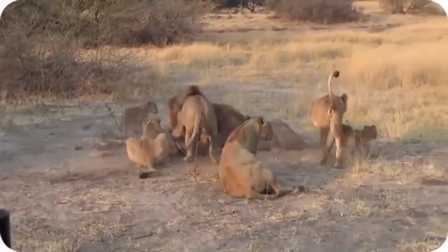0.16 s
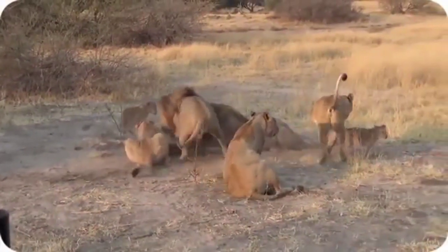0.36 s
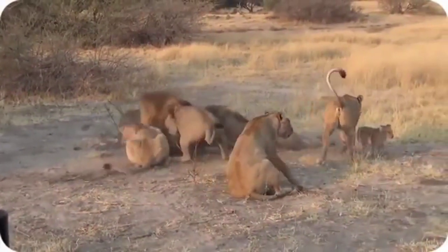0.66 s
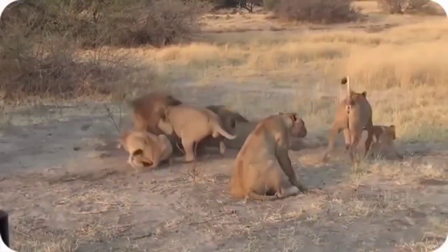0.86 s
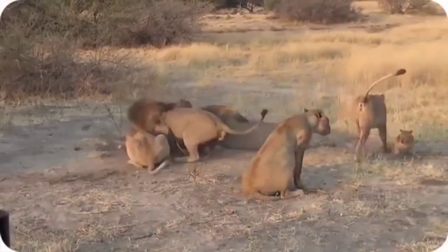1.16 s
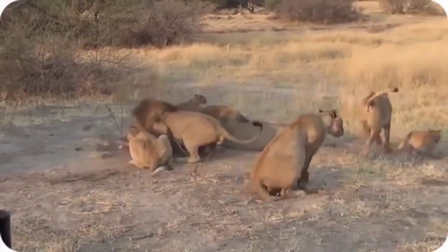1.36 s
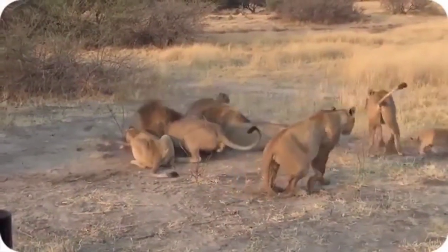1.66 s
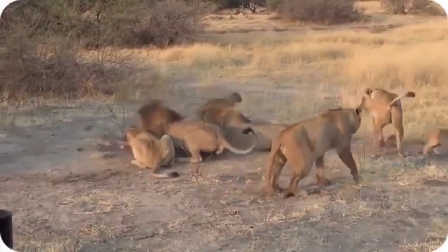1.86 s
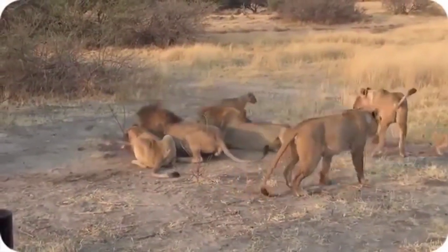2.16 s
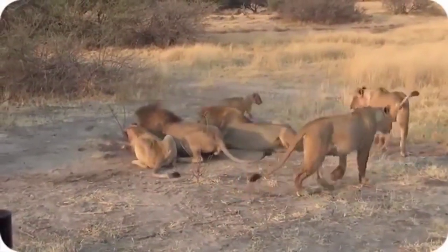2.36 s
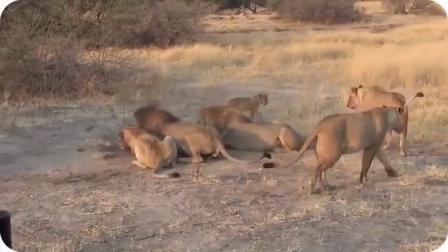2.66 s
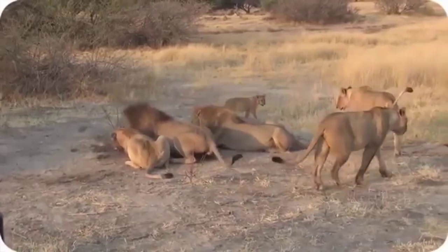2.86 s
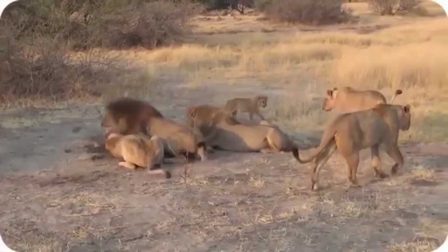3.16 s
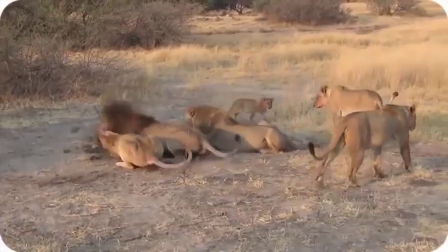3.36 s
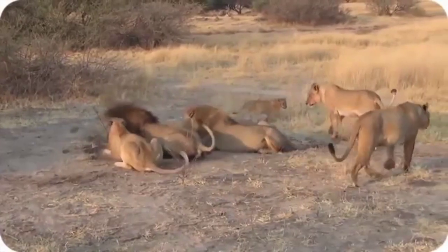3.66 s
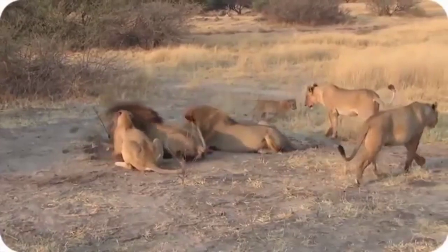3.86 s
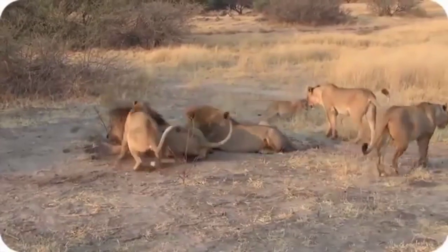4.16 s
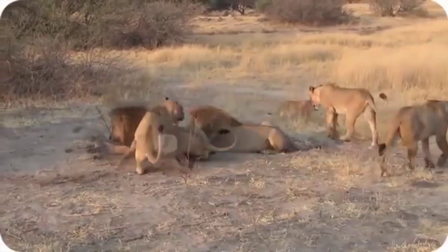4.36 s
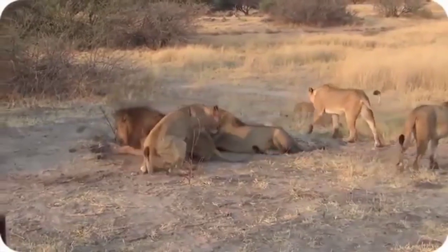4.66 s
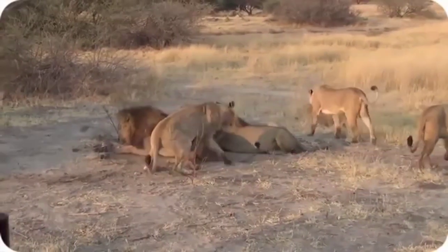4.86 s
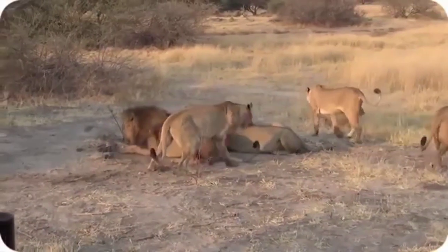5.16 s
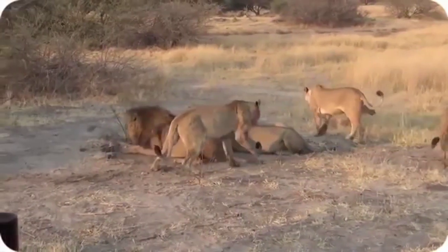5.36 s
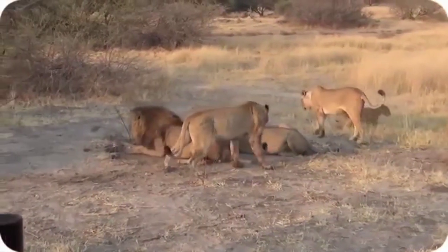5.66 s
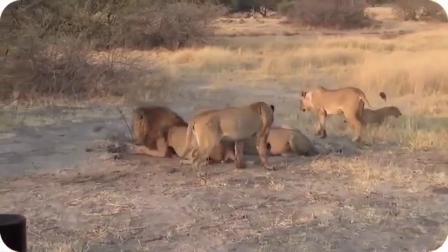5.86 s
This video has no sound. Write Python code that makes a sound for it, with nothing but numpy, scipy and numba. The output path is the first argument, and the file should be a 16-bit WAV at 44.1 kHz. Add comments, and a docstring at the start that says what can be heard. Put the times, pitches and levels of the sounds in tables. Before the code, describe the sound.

Deep throaty lion growls and torn, raspy snarls over dry open ground, fading to a soft whining moan, with a nearby camera click at each end.

```python
"""Dry open plain, lions a little left of centre squabbling over food, a camera close to the microphone.
A deep rattling growl, made of uneven vocal fold pulses and single slaps, runs under two loud snarling bouts
of tones and torn air; then one animal whines and moans in nearly pure tones. Filtered noise makes the hisses,
a bright rustle of grass and breath, snapping twigs and faint air; noise bursts make the camera shutter, which
fires twice. The loudest snarls overload the recorder."""
import sys
import numpy as np
from scipy import signal
from scipy.fft import rfft, irfft
from scipy.io import wavfile
from scipy.ndimage import uniform_filter1d, map_coordinates
from numba import njit

SR = 44100
rng = np.random.default_rng(int(sys.argv[2]) if len(sys.argv) > 2 else 0)


def pcm_store(signal):
    """Save signal as 16-bit PCM."""
    levels = np.round(np.clip(np.atleast_2d(signal), -1, 1) * 32767)
    wavfile.write(sys.argv[1], SR, levels.astype(np.int16).T)


N = 265041
TIME = np.arange(N) / SR


def undb(db):
    """Decibels to gain."""
    return 10 ** (np.asarray(db) / 20)


def unit(x):
    """Scale to rms 1."""
    return x / np.sqrt(np.mean(x ** 2))


def even(x, span_s):
    """Hold the slow level near rms 1 and keep the fast texture."""
    size = max(int(span_s * SR), 8)
    power = uniform_filter1d(uniform_filter1d(x ** 2, size), size)
    floor = 1e-6 * np.mean(x ** 2)
    return x / np.sqrt(np.abs(power) + floor)


def curves(rows):
    """Columns of a table joined by straight lines."""
    s, *columns = np.transpose(rows)
    return [np.interp(TIME, s, c) for c in columns]


def phrases(tables, fade_s=0.0027):
    """Columns of several tables, led by a gate that is open during each."""
    gate = 0
    for table in tables:
        start, end = table[0][0], table[-1][0]
        inside_s = np.minimum(TIME - start, end - TIME)
        gate = gate + np.clip(inside_s / fade_s + 1, 0, 1)
    return [np.minimum(gate, 1)] + curves(np.vstack(tables))


def swells(rows, attack_s, release_s, sag_db_per_s=0):
    """Gain of (start, length, dB) events: each rises, holds with a steady sag, then dies away."""
    gain = np.zeros(N)
    for start, length, db in rows:
        age = np.maximum(TIME - start, 0)
        rise = np.minimum(age / attack_s, 1)
        release = np.exp(-np.maximum(age - length, 0) / release_s)
        level = undb(db - sag_db_per_s * np.minimum(age, length))
        gain = np.maximum(gain, rise * release * level)
    return gain


def noise():
    """White noise."""
    return rng.standard_normal(N)


def walk(rate):
    """Random drift of spread near 1: straight lines between `rate` random points per second."""
    return np.interp(TIME * rate, np.arange(4096), rng.standard_normal(4096))


@njit
def svf(x, hz, width):
    """Moving band-pass, gain 1 at the centre."""
    y, b, l = np.empty(len(x)), 0., 0.
    for i in range(len(x)):
        g, k = np.tan(np.pi * hz[i] / SR), width[i] / hz[i]
        v = (b + g * (x[i] + 1e-18 - l)) / (1 + g * (g + k))
        b, l, y[i] = 2 * v - b, l + 2 * g * v, k * v
    return y


def band(x, hz, width):
    """One resonance, fixed or moving."""
    return svf(x, hz * np.ones(N), width * np.ones(N))


def ring(x, modes):
    """A set of fixed resonances."""
    return sum(undb(db) * band(x, hz, width) for hz, width, db in modes)


def colour(x, points):
    """Causal (minimum-phase) filter through (Hz, dB) points."""
    hz, db = np.transpose(points)
    size = 4096
    bin_hz = np.arange(size // 2 + 1) * SR / size
    log_gain = np.log(undb(np.interp(np.log(bin_hz + 1), np.log(hz), db)))
    cepstrum = irfft(log_gain)[:size // 2]
    cepstrum[0] /= 2
    response = irfft(np.exp(rfft(2 * cepstrum, size)))
    return signal.fftconvolve(x, response)[:N]


def passband(x, low_hz, high_hz, order=2):
    """Steep band limits."""
    sos = signal.butter(order, [low_hz, high_hz], "band", fs=SR, output="sos")
    return signal.sosfilt(sos, x + 1e-18)


def strikes(times, sizes):
    """Impulses at given times."""
    samples = np.clip(np.asarray(times) * SR, 0, N).astype(int)
    return np.bincount(samples, sizes, N + 1)[:N]


def fade(x, decay_s):
    """Each impulse dies away exponentially."""
    return signal.lfilter([1], [1, -np.exp(-1 / (decay_s * SR))], x + 1e-18)


def damped(times, sizes, hz, decay_s, rise_s):
    """One damped resonance per event, each with its own pitch."""
    t = TIME[:SR // 12]
    envelope = np.exp(-t / decay_s) * (1 - np.exp(-t / rise_s))
    out = np.zeros(N + len(t))
    for at, size, f in zip((times * SR).astype(int), sizes, hz):
        out[at:at + len(t)] += size * np.sin(2 * np.pi * f * t) * envelope
    return out[:N]


def tone(hz, wobble, overtones=()):
    """A tone whose pitch trembles quickly; overtones are (multiple, dB)."""
    phase = 2 * np.pi * np.cumsum(hz * (1 + wobble * walk(150))) / SR
    partials = sum(undb(db) * np.sin(k * phase) for k, db in overtones)
    return np.sqrt(2) * (np.sin(phase) + partials)


def folds(hz, rough, jitter, scatter_db):
    """Vocal fold pulses of uneven spacing and strength."""
    phase = np.cumsum(hz * np.exp(jitter * rough * walk(np.mean(hz)))) / SR
    pulses = np.diff(np.floor(phase), prepend=0)
    return pulses * undb(scatter_db * rough * noise())


def mouth(x, modes, drift):
    """Resonances that wander in pitch and level as tongue and lips move."""
    drift = np.clip(drift, 0, .2)
    out = 0
    for hz, width, db in modes:
        level = undb(db + 8.3 * walk(21.41))
        out = out + level * band(x, hz * np.exp(drift * walk(14)), width)
    return out


def waver(x, drift, rate):
    """Slide all resonances of a sound up and down together by a wandering delay."""
    lag = uniform_filter1d(walk(rate), SR // 40) * drift * SR / rate / np.sqrt(2)
    return map_coordinates(x, [np.arange(N) + lag], order=3, mode="mirror")


def place(x, pan_db, spread_db):
    """Level difference between the channels (positive is left), plus scatter from ground and bushes."""
    t = TIME[:SR // 4]
    tail = rng.standard_normal((2, len(t))) * np.exp(-t / 0.0068) * (t > .004)
    tail /= np.sqrt(np.sum(tail ** 2, axis=1, keepdims=True))
    scatter = signal.fftconvolve(x[None], tail, axes=1)[:, :N]
    direct = x * undb(np.array([[pan_db], [-pan_db]]) / 2)
    return direct + undb(spread_db) * scatter


# spectrum of the air over the plain: (frequency [Hz], level [dB])
PLAIN_COLOUR = [(180, -19.5), (300, -2), (439, -1), (509, -27), (663, -2.5), (1020, -15), (1140, -3.5),
                (1490, -13.5), (2930, -19), (3230, -20.5), (4420, -29), (5660, -17.5), (9760, -22),
                (14500, -24), (15500, -66)]


def plain():
    """Faint, nearly steady hiss of the open plain, with a little low rumble: two filtered noises."""
    air = unit(colour(noise(), PLAIN_COLOUR)) * undb(-45.5 + walk(7.1))
    rumble = undb(-49) * unit(passband(noise(), 35, 300))
    return air + rumble


# the two shutter cycles beside the microphone: (time [s])
SHUTTER_TIMES = [.2212, 5.7660]
# blows of mirror and curtains within one cycle: (delay [s], level [dB], decay [s])
SHUTTER_BLOWS = [(0, 0, .0035), (.02, -2.5, 0.0034), (.046, -15.5, .006), (.0495, -5, .004),
                 (.0545, -4.5, .005), (.066, -9, 0.0091), (.072, -15, .008), (.082, -6, .006),
                 (.0875, -2.5, .004), (.095, -9.5, 0.0057)]
# spectrum of the camera body: (frequency [Hz], level [dB])
SHUTTER_COLOUR = [(530, -29), (900, -11.5), (1260, -15), (1370, -5), (1590, -25), (1670, -5), (1750, 1),
                  (3380, -18.5), (3710, -12.5), (5060, -19.5), (6580, -7), (8440, -16), (10100, -7.5),
                  (14400, -19), (15500, -19)]


def shutter():
    """Mirror and curtains strike the camera body, whose spring rings briefly."""
    blows = 0
    for delay, db, decay in SHUTTER_BLOWS:
        sizes = undb(db) * np.ones(len(SHUTTER_TIMES))
        blows = blows + fade(strikes(np.add(SHUTTER_TIMES, delay), sizes), decay)
    rattle = blows * noise()
    spring = ring(rattle, [(1790, 120, -1.5), (1870, 92, -7), (6100, 900, -8), (11400, 1100, -19)])
    return undb(-1) * colour(rattle, SHUTTER_COLOUR) + undb(-8) * spring


# bright rustle and breath: scuffed grass, the hiss of the snarls, a faint rise of air:
# (start [s], length [s], level [dB])
RUSTLES = [(.325, 0.31, -38.5), (.49, 0.19, -35.5), (.62, .03, -34.5), (.695, 0.043, -32.5),
           (1.0, 0.239, -49), (1.3, .17, -49), (3.003, .02, -40), (3.04, .2, -47.5), (3.41, 0.062, -34.5),
           (3.61, 0.095, -45), (3.76, 0.23, -48.5), (4.15, 0.035, -48), (4.317, 0.044, -39),
           (4.385, 0.048, -42), (4.6, 0.46, -53), (5.05, 0.52, -52.5)]
# spectrum of the rustle: (frequency [Hz], level [dB])
RUSTLE_COLOUR = [(880, -1.5), (1500, -22), (2310, -8), (3430, -5.5), (4410, -12), (6740, 1.5), (7720, -6),
                 (9630, -3.5), (10800, -9), (14400, -16.5), (15000, -23)]
# dry twigs snapping: (time [s], level [dB])
TWIGS = [(.0765, -29), (.1988, -24.5), (0.473, -23), (.5147, -27), (.6135, -28), (0.6295, -18), (.668, -32),
         (1.5369, -32), (1.563, -33), (1.662, -29.5), (2.7108, -31.5), (2.9247, -31), (3.0123, -21.5),
         (4.3488, -24), (4.602, -26.5), (5.3978, -30)]


def rustle():
    """Scuffed grass, the hiss of the snarls and a faint rise of air, all crackling noise; twigs snap."""
    level = swells(RUSTLES, attack_s=0.0075, release_s=.015, sag_db_per_s=10)
    crackle = noise() * undb(5.3 * walk(500))
    s, db = np.transpose(TWIGS)
    snaps = fade(strikes(s, undb(db)), 0.0022) * noise()
    return level * unit(colour(crackle, RUSTLE_COLOUR)) + undb(-0.5) * passband(snaps, 4900, 11600)


# whine sliding into a moan: (time [s], pitch [Hz], fundamental level [dB], second partial level [dB])
WHINE = [(4.9, 140, -26, -27.5), (4.985, 184, -6, -30.5), (5.05, 206.8, -10.5, -19.5),
         (5.09, 217.3, -28, -19.5), (5.164, 229, -42, -16), (5.4, 209.8, -33, -20.5),
         (5.46, 207, -17.5, -23), (5.518, 197, -12, -24), (5.56, 211.2, -28.5, -42),
         (5.7, 217.5, -29.5, -46), (5.826, 210.3, -19, -23), (5.904, 196.7, -11.5, -30.5),
         (6.01, 225, -34, -48)]
# a second tone, lower than the whine's second partial: (time [s], pitch [Hz], level [dB])
UNDERTONE = [(5.1, 342, -27), (5.17, 341.5, -21.5), (5.232, 308, -22), (5.316, 366.5, -16),
             (5.4, 329.5, -9), (5.47, 380, -33)]
# a creak an octave below the moan: (start [s], length [s], level [dB])
CREAK = [(5.78, 0.203, -22.5)]


def whine():
    """A nearly pure voice rises, splits into two tones, turns hoarse and settles to a creaky closed-mouth moan."""
    gate, hz, first_db, second_db = phrases([WHINE])
    phase = 2 * np.pi * np.cumsum(hz * (1 + 0.019 * walk(70))) / SR
    upper = np.sin(2 * phase) + undb(-27.0) * np.sin(3 * phase)
    voice = gate * (undb(first_db + 3.5) * np.sin(phase) + undb(second_db + 3.5) * upper)
    creak = swells(CREAK, attack_s=0.069, release_s=.03) * np.sqrt(2) * np.sin(phase / 2)

    gate, under_hz, under_db = phrases([UNDERTONE])
    under = np.pi * np.cumsum(under_hz * (1 + 0.013 * walk(70))) / SR
    split = np.sin(2 * under) + undb(-35) * np.sin(4 * under)
    split += undb(-17.0) * np.sin(under)  # every other cycle is weaker
    split += undb(-30.0) * np.sin(2 * (under + phase))  # the two tones modulate each other

    # hoarse noise climbs to its peak at 5.35 s, then clears faster [dB per s]
    late = TIME - 5.35
    hoarse_db = -16.5 + np.minimum(70 * late, -177 * late)
    hoarse = unit(band(band(noise(), 473, 76), 443, 110)) * undb(hoarse_db)
    return voice + creak + gate * undb(under_db) * split + hoarse


# open-mouthed hisses: (start [s], length [s], level [dB], setting of the teeth's part against it [dB])
HISSES = [(.315, 0.042, -27.5, -18), (.38, 0.27, -37, -5), (0.694, 0.04, -30, -13),
          (0.956, 0.198, -34.5, 4.5), (2.814, 0.054, -41.5, -20), (2.987, 0.047, -34, -1),
          (3.4, .09, -35.5, -1), (4.159, .05, -39, 0), (4.317, 0.013, -32.5, 2), (4.38, 0.051, -46, -7),
          (4.486, 0.012, -37, -5), (5.586, 0.018, -39.5, -25)]
# wandering resonances of the open mouth, also in the snarls: (frequency [Hz], width [Hz], level [dB])
MOUTH = [(878, 110, 13.5), (970, 36, -1), (1314, 100, 5)]
# hissing resonances between the teeth, also in the snarls: (frequency [Hz], width [Hz], level [dB])
TEETH = [(1390, 130, -3), (1800, 200, 0), (2130, 250, -2), (3050, 350, -11), (3800, 400, -19),
         (6000, 1800, -25)]


def hiss():
    """A lion hisses with its jaws open, noise through mouth resonances; bared teeth make it brighter."""
    start, length, db, teeth_db = np.transpose(HISSES)
    air = noise() * undb(5.7 * walk(200))
    jaws = even(passband(mouth(air, MOUTH, drift=0.16), 540, 3000), 0.041)
    teeth = even(passband(mouth(air, TEETH, drift=0.072), 1160, 5600), 0.033)
    jaws_gain, teeth_gain = (swells(zip(start, length, level_db), attack_s=0.014, release_s=.014)
                             for level_db in (db, db + teeth_db - 6))
    return jaws * jaws_gain + teeth * teeth_gain


# short rising yowls within the growl: (start [s], length [s], from [Hz], to [Hz], level [dB])
YOWLS = [(1.89, .06, 580, 900, -35), (1.975, .075, 620, 930, -36), (2.49, .04, 560, 780, -37),
         (2.57, .045, 460, 780, -32)]


def yowls():
    """Thin, rough tones that slide upwards."""
    out = np.zeros(N)
    for start, length, from_hz, to_hz, db in YOWLS:
        part = np.clip((TIME - start) / length, 0, 1)
        arch = np.sqrt(np.abs(np.sin(np.pi * part)))
        out += undb(db) * arch * tone(from_hz + (to_hz - from_hz) * part, wobble=0.0195)
    return out


# deep growls, one per push of air: (start [s], length [s], chest level [dB], throat level [dB])
GROWLS = [(-.03, .14, -14.5, -16), (0.146, 0.13, -13, -14.5), (0.318, 0.14, -15, -14.5),
          (0.48, 0.15, -16, -18.5), (0.686, 0.055, -7.5, -11.5), (.81, 0.28, -20.5, -8.5),
          (1.159, 0.14, -17, -14), (1.31, .16, -12, -13), (1.459, .13, -12, -15),
          (1.634, 0.13, -15.5, -16.5), (1.815, 0.25, -15.5, -10.5), (2.086, 0.072, -21.5, -26),
          (2.258, 0.062, -15.5, -16), (2.402, .1, -14.5, -14), (2.487, .18, -17.5, -13),
          (2.683, 0.13, -21.5, -28.5), (2.815, 0.065, -16.5, -22), (2.962, 0.082, -10.5, -5.5),
          (3.051, 0.096, -21.5, -13), (3.217, 0.087, -13.5, -6), (3.389, 0.17, -9.5, -6),
          (3.611, 0.098, -12.5, -11), (3.799, 0.082, -15, -9), (3.899, 0.23, -20, -15),
          (4.18, 0.042, -12, -19), (4.277, .23, -12.5, -15), (4.516, 0.14, -20, -34.5),
          (4.709, 0.036, -28.5, -50), (4.83, 0.13, -15, -26), (4.919, .13, -13, -16),
          (5.066, 0.17, -27.5, -24.5), (5.494, 0.25, -28.5, -42), (5.744, 0.24, -25.5, -32)]
# chest resonances: (frequency [Hz], width [Hz], level [dB])
CHEST = [(80, 23, -30), (127.4, 41.3, 16), (160, 32, -17)]
# spectrum of the growling throat: (frequency [Hz], level [dB])
GROWL_THROAT = [(100, -28), (170, 5), (205, -6), (243, 7.5), (312, -1.5), (470, 1), (516, -5.5),
                (690, -27.5), (864, -23), (1050, -41), (1170, -23), (1280, -30), (1930, -39.5), (3410, -46),
                (4000, -69), (5200, -82), (8800, -120)]


def growl(slap_s):
    """Slow, uneven pulses boom in the chest and rattle in the throat."""
    start, length, chest_db, throat_db = np.transpose(GROWLS)
    chest_level, throat_level = (
        swells(zip(start, length, db), attack_s=0.016, release_s=0.023, sag_db_per_s=13)
        for db in (chest_db, throat_db))
    pulses = folds(52, rough=1, jitter=.3, scatter_db=4.0)
    air = fade(pulses, 0.012) * noise()
    chest = passband(ring(pulses + 0.042 * air, CHEST), 61.0, 177, order=3)
    throat = waver(colour(pulses + 0.077 * air, GROWL_THROAT), drift=.07, rate=13)
    # while the folds slap singly they flutter less
    midpoints = (slap_s[1:] + slap_s[:-1]) / 2
    gap_s = np.abs(TIME - slap_s[np.searchsorted(midpoints, TIME)])
    held = np.exp(-(gap_s / .022) ** 2)
    chest_gain = (1 - .3 * held) * chest_level
    throat_gain = (1 - .62 * held) * throat_level * undb(-2.0)
    return chest_gain * even(chest, 0.028) + throat_gain * even(throat, 0.025)


# slaps given one by one, loud and soft, some within or ending a rattle:
# (time [s], level [dB], rasp level against it [dB], jaw opening [0-1])
SINGLE_SLAPS = [(.076, -1, -23, 0.65), (.336, -5.5, -25, 0.07), (.42, -7, -27, 1),
                (.499, -1.5, -15.5, 0.73), (.628, -7, -21, .8), (.736, -2.5, -22, 0),
                (.819, -0.5, -29, 0.87), (1.106, 1, -13, 0.1), (1.138, 5, -24, 0.04),
                (1.859, 5.5, -30, .05), (2.007, 1, -40, 0), (2.184, -10.5, -21, 0.97),
                (2.227, -5, -20, 0.83), (2.289, -9, -22, 0.08), (2.364, -14, -18, 0.87),
                (2.451, 3, -28, 0.24), (2.51, -8.5, -31, 0.88), (2.619, -6, -15.5, 0.86),
                (2.713, -15, -17, 1), (3.165, -1, -11.5, 0.93), (3.19, 0, -13.5, 0.78),
                (3.208, -0.5, -17, 0.94), (3.396, 3.5, -18, 0.7), (3.499, -0.5, -24, 0.47),
                (3.52, 1.5, -22, 0.55), (4.494, -7, -14.5, 0.63)]
# rattles, runs of slaps of the slack vocal folds:
# (start [s], length [s], rate [slaps/s], level [dB], rasp level against it [dB], jaw opening [0-1])
RATTLES = [(.002, .055, 48, -6.5, -28.5, .85), (.17, .085, 29, -7.5, -23.5, 0.38),
           (1.553, .285, 29.4, -3.5, -24, 0.21), (1.909, .08, 44.5, 0, -30.5, 0.12),
           (2.032, .105, 33.5, -3, -27, 0.25), (2.381, .06, 37.3, -2, -28.5, .4),
           (2.567, .1, 38, -9.5, -40, 0.45), (2.975, .04, 41.3, -1.5, -23.5, 0.63),
           (3.05, .085, 42, -0.5, -27, 1), (4.083, .135, 32.7, -11.5, -18.5, 0.24),
           (4.298, .145, 36.8, -5, -27.5, 0.61), (4.552, .06, 28, -25, -25, .5),
           (4.826, .21, 27, -19.5, -12.5, 0.2)]


def slap_events():
    """Every slap as (s, dB, rasp dB, jaw opening), in order: those given one by one and the uneven runs."""
    rows = list(SINGLE_SLAPS)
    for start, length, rate, db, rasp_db, jaw in RATTLES:
        chance = rng.standard_normal(size=(16, 3))
        for age, (late, louder, wider) in zip(np.arange(0, length, 1 / rate), chance):
            rows.append((start + age + .0005 * late, db + 1.5 * louder, rasp_db, jaw + 0.094 * wider))
    return np.array(sorted(rows))


# the throat's two ringing resonances:
# (jaws shut [Hz], jaws open [Hz], level shut [dB], level open [dB], rise [s])
SLAP_MODES = [(230, 371, 1.5, -8.5, 0.0036), (442, 490, -14, -0.5, 0.0022)]
# spectrum of the crack of a slap: (frequency [Hz], level [dB])
CRACK = [(60, -33.5), (140, -6), (240, 0), (380, 2.5), (520, -2), (620, -15.5), (720, -20.5), (1200, -30.5),
         (4000, -96)]
# rasp resonances of the mouth: (frequency [Hz], width [Hz], level [dB])
SLAP_RASP = [(860, 110, -1), (1180, 170, -2), (1520, 220, -8), (2050, 300, -11), (2900, 500, -21)]


def slaps(events):
    """The folds slap and rebound: a crack; throat rings (retuned by the jaws), chest thumps, mouth barks."""
    s, db, rasp_db, jaw = events.T
    jaw = np.clip(jaw, 0, 1)
    detune = np.exp(0.053 * rng.standard_normal(len(s)))
    throat = 0
    for shut_hz, open_hz, shut_db, open_db, rise_s in SLAP_MODES:
        sizes = undb(db + shut_db + jaw * (open_db - shut_db))
        hz = detune * (shut_hz + jaw * (open_hz - shut_hz))
        throat = throat + damped(s, sizes, hz, 0.0091, rise_s)
    rebound_s = rng.uniform(0.00398, 0.008, len(s))
    push = strikes(s, undb(db)) + strikes(s + rebound_s, undb(db - 3.5))
    crack = undb(31) * colour(push, CRACK)
    chest = passband(band(strikes(s, undb(db - 12.5)), 141, 46), 44, 350)
    body = undb(-1) * passband(throat, 125, 770) + crack + undb(41.0) * chest

    sharp = strikes(s, undb(db + rasp_db))
    torn_air = 0.1 * fade(sharp, 0.0048) * noise()
    rasp = undb(27.0) * passband(ring(sharp + torn_air, SLAP_RASP), 600, 2900)
    bark = undb(6.5) * damped(s, undb(db + rasp_db), 887 * detune ** 2, 0.0044, rise_s=0.002)
    return body, rasp + bark


# three snarls in two bouts: (time [s], pulse rate [Hz], low tone [Hz], upper tone [Hz],
# low voice level [dB], upper voice level [dB], rasp level [dB])
SNARLS = [
    [(.815, 60.04, 289, 569, -10.5, -12, -31), (.85, 75, 282.3, 543.8, -12.5, -10.5, -30),
     (.93, 105.1, 227.8, 479.5, -8.5, -6.5, -34), (.99, 115, 242.4, 410, -11.5, -8, -27),
     (1.08, 120.2, 230.8, 587.6, -16, -12.5, -31.5), (1.135, 115, 218.6, 553, -20, -13, -25.5),
     (1.19, 122, 257, 605.7, -25, -17, -33), (1.27, 135, 263.9, 570, -28, -28, -40.5)],
    [(1.28, 139.9, 276.1, 581, -28, -20, -46), (1.305, 150.1, 298.7, 615.5, -7, -6, -30),
     (1.34, 148, 288.2, 668, -11, -14.5, -34), (1.41, 132.1, 261.2, 505, -9, -22, -35),
     (1.5, 119.7, 279.3, 438.3, -23, -32, -42)],
    [(3.195, 72, 360, 630, -11, -10.5, -32.5), (3.28, 97.06, 285.7, 500, -9.5, -9.5, -27.5),
     (3.36, 125, 297.5, 435, -14, -14, -32), (3.41, 107.5, 275, 570.7, -14, -15.5, -25.5),
     (3.52, 117.9, 247.4, 585, -15, -13.5, -29.5), (3.61, 142.3, 297.4, 489.7, -16.5, -12.5, -44),
     (3.67, 152.9, 307, 484.3, -19.5, -9.5, -35.5), (3.75, 152.3, 303.2, 560.1, -13.5, -21.5, -41),
     (3.84, 114.8, 281, 557, -8, -12, -31.5), (3.91, 93.1, 315.5, 462.6, -9.5, -12.5, -38.5),
     (4.02, 79.88, 262.5, 439.5, -6, -25, -33), (4.09, 70.4, 254.4, 438.5, -17, -43, -50),
     (4.21, 54.01, 247, 453.5, -17, -45, -44), (4.24, 50.09, 244.6, 445, -34, -49, -62)],
]
# the faster the folds beat, the smoother and clearer the voice:
# (pulse rate [Hz], roughness [0-1], clear share of the low tone [0-1], of the upper tone [0-1])
SNARL_TEXTURE = [(55, .7, .25, .35), (105, .5, .72, .58), (155, .24, .92, .75)]
# overtones of the low snarl tone: (multiple [-], level [dB])
OVERTONES = [(2, -18), (3, -22), (4, -26), (5, -32)]


def snarls():
    """Two tones ride on fast, uneven pulses; air tears through the mouth and past the teeth on each pulse."""
    gate, hz, low_hz, high_hz, low_db, upper_db, rasp_db = phrases(SNARLS, fade_s=0.00093)
    rates, *texture = np.transpose(SNARL_TEXTURE)
    rough, low_clear, high_clear = (np.interp(hz, rates, column) for column in texture)
    pulses = folds(hz, rough, jitter=.25, scatter_db=5.5)
    air = fade(pulses, 0.0048) * noise()
    source = pulses + 0.077 * rough * air
    rough_low = even(passband(band(source, low_hz * 1.134, 137), 173, 344), 0.03)
    rough_upper = even(passband(band(source, high_hz, 210), 400, 656, order=4), 0.016)

    # each closing of the folds feeds the low tone, so slow pulses make it flutter
    flutter = even(fade(fade(pulses, 0.0053), 0.00091), 0.083)
    clear_low = flutter * tone(low_hz, wobble=0.0305, overtones=OVERTONES)
    flicker = undb(2.5 * (walk(30) - .3))
    clear_upper = tone(high_hz, wobble=0.029) * flicker
    low = np.sqrt(1 - low_clear) * rough_low + np.sqrt(low_clear) * clear_low
    upper = np.sqrt(1 - high_clear) * rough_upper + np.sqrt(high_clear) * clear_upper
    voice = low * undb(low_db) + upper * undb(upper_db - 2.5)

    rasp = even(passband(mouth(pulses + 0.095 * air, MOUTH, drift=0.11), 690, 1620), 0.11)
    teeth = even(passband(mouth(pulses + 0.24 * air, TEETH, drift=0.073), 1330, 5400), 0.055)
    spit = even(passband(air, 5500, 10200), 0.054)
    torn = rasp + undb(-10.5) * teeth + undb(-17.5) * spit
    return gate * voice, gate * torn * undb(rasp_db)


def scene():
    """The squabbling lions are a little to the left, the whine near the centre, the camera close and central."""
    events = slap_events()
    slap, slap_rasp = slaps(events)
    snarl, snarl_rasp = snarls()
    background = place(plain(), pan_db=-1.5, spread_db=-19)
    camera = place(shutter(), pan_db=0, spread_db=-10)
    bright = place(rustle(), pan_db=1.5, spread_db=-7)
    moan = place(whine(), pan_db=-0.1, spread_db=-14.5)
    rasps = place(slap_rasp + snarl_rasp + hiss(), pan_db=6.5, spread_db=-3)
    deep = place(growl(events[:, 0]) + slap + yowls(), pan_db=2.8, spread_db=-17)
    loud = place(snarl, pan_db=3.3, spread_db=-16)
    return background + camera + bright + moan + rasps + deep + loud


def record(dry):
    """The recorder flattens peaks near full scale and cuts the top above 15.2 kHz."""
    knee = 8  # higher is a harder corner
    clipped = dry / (1 + np.abs(dry) ** knee) ** (1 / knee)
    return signal.sosfilt(signal.ellip(8, .2, 70, 15200, fs=SR, output="sos"), clipped)


dry = scene()
out = record(dry)
pcm_store(out)
```